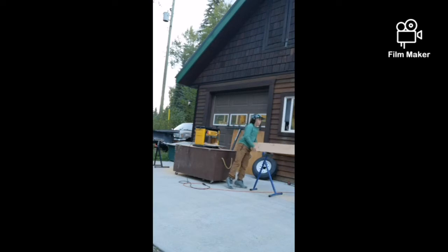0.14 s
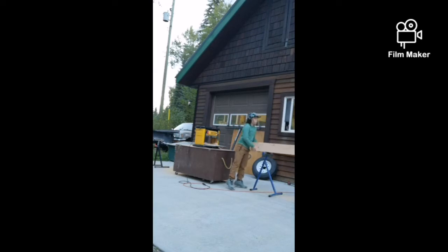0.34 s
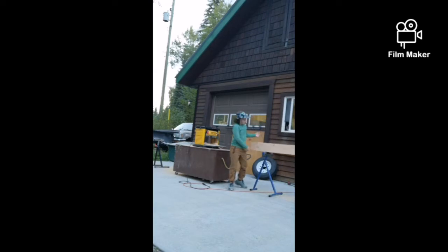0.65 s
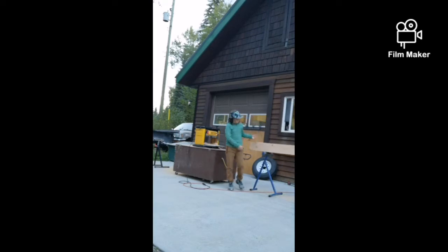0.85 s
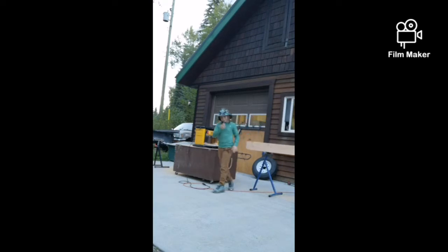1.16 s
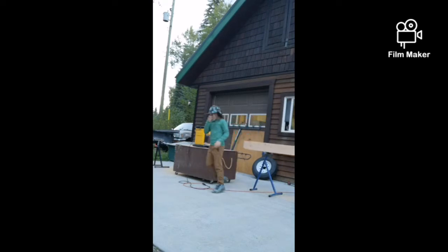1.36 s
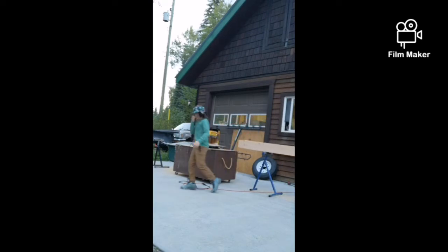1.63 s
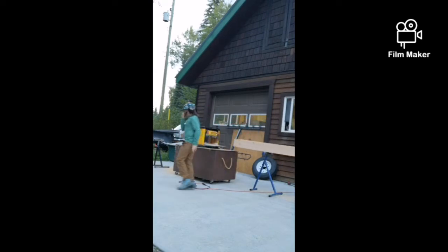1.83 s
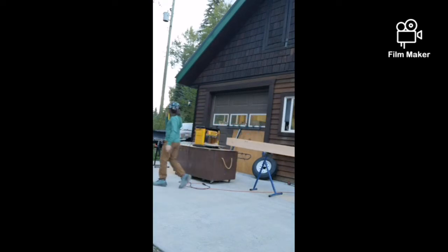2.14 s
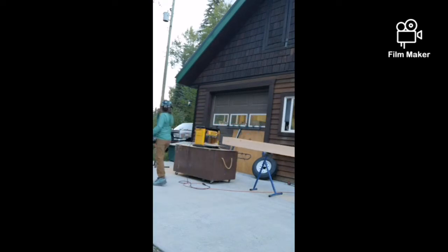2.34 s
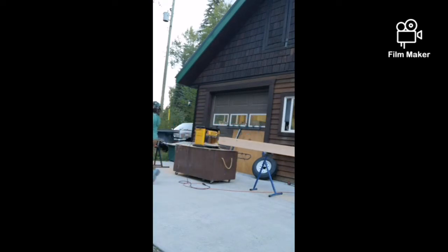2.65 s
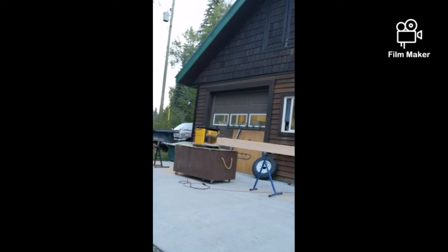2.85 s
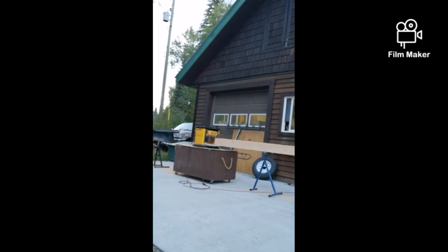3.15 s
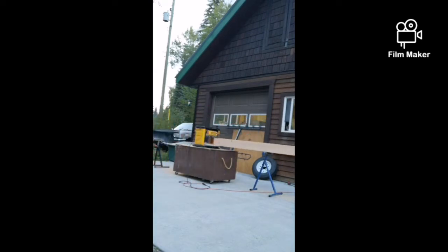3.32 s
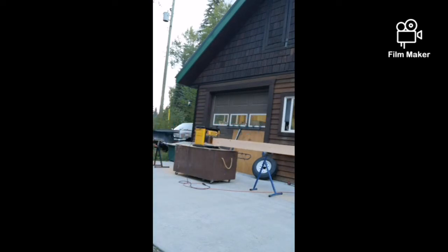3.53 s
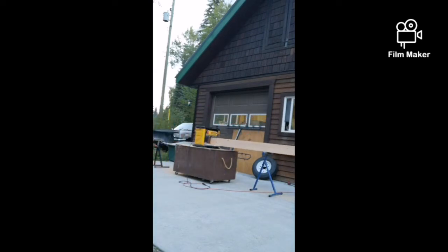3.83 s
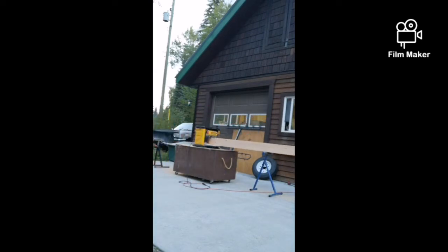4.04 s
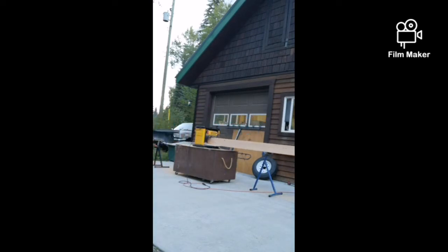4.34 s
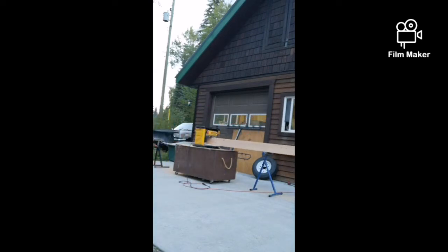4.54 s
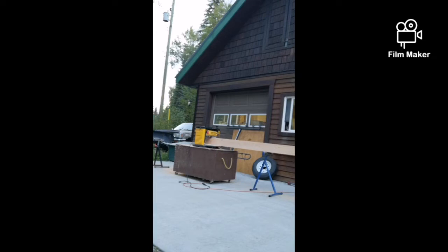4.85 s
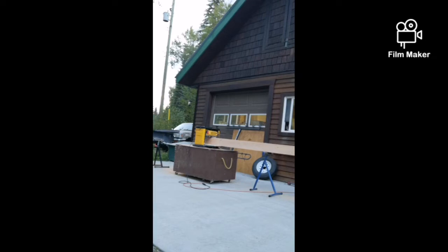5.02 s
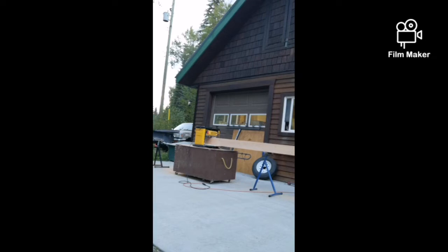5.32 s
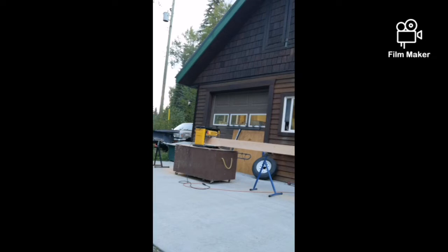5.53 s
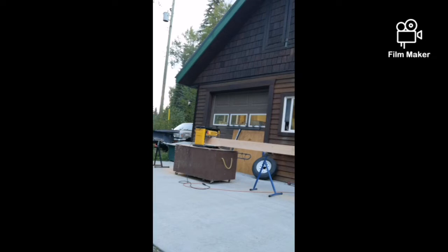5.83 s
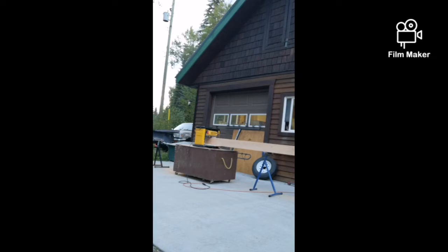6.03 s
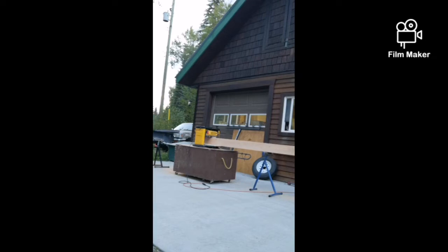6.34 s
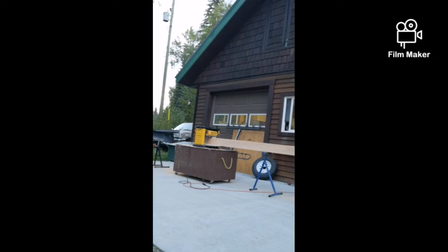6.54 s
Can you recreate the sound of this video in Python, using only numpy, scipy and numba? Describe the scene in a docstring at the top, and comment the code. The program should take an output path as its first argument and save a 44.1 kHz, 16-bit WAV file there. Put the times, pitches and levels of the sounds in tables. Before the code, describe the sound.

An electric wood planer idles steadily in a yard, then rasps and hammers through timber, chips hissing and the motor slowing.

```python
"""A paved yard in front of a garage, where a benchtop planer runs some metres from a phone.
Idling, its cutter head hums and the motor fan whines over rushing air; a passer-by shades the treble.
A wooden post bumps and squeaks through the rollers, then meets the knives with a short shriek.
They hammer and rasp the timber, chips hiss, and the load drags the motor's pitch down."""
import sys
import numpy as np
from scipy import signal
from scipy.fft import rfft, irfft
from scipy.io import wavfile
from scipy.ndimage import uniform_filter1d
from numba import njit

SR = 44100
rng = np.random.default_rng(int(sys.argv[2]) if len(sys.argv) > 2 else 0)


def to_wav(sig):
    """Store sig (one row per channel, or 1-D mono) as 16-bit WAV at the path in sys.argv[1].

    Samples outside -1..1 are clipped; the rate is SR.
    """
    pcm = np.clip(np.atleast_2d(sig), -1, 1) * 32767
    pcm = np.round(pcm).astype(np.int16)
    wavfile.write(sys.argv[1], SR, pcm.T)  # frames by channels


N = 294588
TIME = np.arange(N) / SR
FREQS = np.maximum(np.fft.rfftfreq(N, 1 / SR), 1)

# cutter head speed, sagging under load: time_s, speed_hz
HEAD_SPEED = [(0, 171.85), (3.6, 172.07), (4.68, 171.8), (4.85, 168.6), (4.95, 165.2), (5.16, 159.7),
              (5.34, 152.6), (5.69, 132.8), (5.8, 131.4), (6.15, 131.5), (6.34, 127.5), (6.68, 128.35)]
# harmonics of the hum: head_speed_multiple, level_db
HUM_HARMONICS = [(1, 0), (2, -16.5), (3, -28), (4, -34), (6, -24)]
# pitches where reflections cancel the hum: pitch_hz, width_hz, gain_db
HUM_NULLS = [(160.4, 4.5, -19), (127, 11, -27)]
# motor unbalance and fan blade tones: motor_speed_multiple, level_db
FAN_TONES = [(1, -44), (8, -56), (12, -43.5), (15, -46.5), (16, -40.5), (17, -53), (19, -48.5), (20, -41.5),
             (21, -51)]
# EQ of the air rushing through fan and head: frequency_hz, gain_db
AIR_EQ = [(25, -23.5), (65, -17.5), (90, -4.5), (150, 6), (205, -4.5), (430, 2.5), (750, -4), (1130, -4),
          (1290, -14.5), (1850, -10.5), (2250, -3.5), (3000, -9), (4400, -9), (7200, -7.5)]
# fan duct resonances: pitch_hz, width_hz, boost_db
DUCT_PEAKS = [(1030, 270, 1), (1693, 65, 7), (2600, 1400, 1.5), (3473, 130, 8), (4930, 150, 3.5),
              (5700, 420, 3.5), (6310, 110, 9.5), (6730, 48, 10), (6990, 170, 11.5)]
# dull bumps as the post is drawn in: start_s, pitch_hz, decay_s, level_db
BUMPS = [(3.171, 36.6, 0.17, -50), (3.402, 89, 0.42, -44)]
# the knives dig in: start_s, length_s, depth, added_roughness, pocket_start_hz, pocket_end_hz
BITES = [(4.694, 0.12, 0.45, 0.02, 3300, 2130), (4.995, .17, 0, 0, 2470, 1540),
         (5.3, 0.074, 0.03, 0, 2730, 1660), (5.537, 0.087, 0.48, 0, 2760, 2010),
         (6.148, 0.15, 0.78, 0, 3170, 1160)]
# slaps off paving and wall: delay_s, level_db
ECHOES = [(.0023, -14), (.0117, -14)]
# low resonances of the post: pitch_hz, width_hz, level_db
POST_MODES = [(270, 9, -2.4), (304, 9, 0.0), (379, 9, -2.0), (416, 9, -10.7), (457, 25, -8.9),
              (502, 9, -10.0), (549, 9, -1.2), (600, 23, -5.3)]
# resonances of the planer's housing: pitch_hz, width_hz, level_db
HOUSING_MODES = [(650, 10, -2.5), (708, 9, -3.6), (768, 19, -5.3), (862, 10, -7.1), (895, 9, -9.7),
                 (973, 17, -1.4), (1015, 26, -0.3), (1079, 10, 0.0), (1121, 25, -7.0)]
# ring of knives and steel bed: pitch_hz, width_hz, level_db
STEEL_MODES = [(1207, 25, -5.5), (1250, 120, -11), (1399, 42, -7), (1584, 74, -5.5), (1728, 13.7, -2),
               (1824, 97, -6), (1916, 12, -9.5), (2102, 87, -3.5), (2148, 28, -2.5), (2320, 220, -6),
               (2483, 41, -1), (2652, 94, -6), (3184, 41, -6), (3497, 166, -8.5)]
# EQ of the chip spray: frequency_hz, gain_db
CHIP_EQ = [(1500, -20.5), (3300, -14), (4150, 4.5), (4600, 4.5), (5100, 0.5), (5500, 2.5), (6200, 3.5),
           (6600, 1.5), (7100, 6.5), (7800, -7)]
# harmonics that sing at first contact: head_speed_multiple, level_db
SHRIEK_TONES = [(20, -30), (30, -34.5)]

# faders of the cut: even_cut_db, full_strain_boost_db, full_bite_boost_db
BOOM_FADER, KNOCK_FADER = (-31, 2, 4.5), (-28.5, 3, 2)
RASP_FADER, CHIPS_FADER = (-27.5, 4, 4.5), (-33, 5, 9.5)
CONTACT_S = 4.675  # the post meets the knives
GRIP_S, ENGAGE_S = .02, .2  # time for the knives to catch, and for the post to slide fully under
BITE_ATTACK_S, BITE_RELEASE_S = .021, .11


def undb(db):
    """Decibels to gain."""
    return 10 ** (np.asarray(db) / 20)


def unit(x):
    """Scale to rms 1."""
    return x / np.sqrt(np.mean(x ** 2))


def steady(x):
    """Ride the level to rms 1 over a tenth of a second."""
    return x / np.sqrt(uniform_filter1d(x ** 2, SR // 10) + 1e-12)


def tone(cycles):
    """A sine of rms 1 with a random starting phase."""
    return np.sqrt(2) * np.sin(2 * np.pi * (cycles + rng.random()))


def wobble(rate_hz):
    """Smooth random modulation with a spread near 1."""
    steps = rng.standard_normal(1024)
    place = 2 * rate_hz * TIME
    k = place.astype(int) % 1023
    blend = (1 - np.cos(np.pi * (place % 1))) / 2
    return steps[k] + blend * (steps[k + 1] - steps[k])


def swell(start, length, attack, release):
    """Rise, hold until the length is over, fall; times in seconds."""
    return np.clip(np.minimum((TIME - start) / attack, 1 - (TIME - start - length) / release), 0, 1)


def bells(hz, peaks):
    """Summed gain of bell curves at hz, in dB."""
    return sum(db / (1 + (2 * (hz - centre) / width) ** 2) for centre, width, db in peaks)


def colour(x, eq, peaks=()):
    """Apply a broad EQ with bells on top, then scale to rms 1."""
    hz, db = np.transpose(eq)
    shape_db = np.interp(np.log(FREQS), np.log(hz), db) + bells(FREQS, peaks)
    return unit(irfft(rfft(x) * undb(shape_db), N))


def ring(x, modes):
    """Drive a set of resonances; neighbours swing in opposite senses."""
    response = sum((-1) ** k * undb(db) / (1 + 1j * (FREQS ** 2 - hz ** 2) / (FREQS * width))
                   for k, (hz, width, db) in enumerate(modes))
    return irfft(rfft(x) * response, N)


@njit
def sweep(x, hz, width_hz):
    """A band-pass whose centre moves every sample."""
    y, band, low = np.empty(len(x)), 0., 0.
    for i in range(len(x)):
        g, damping = np.tan(np.pi * hz[i] / SR), width_hz / hz[i]
        v = (band + g * (x[i] - low)) / (1 + g * (g + damping))
        band, low = 2 * v - band, low + 2 * g * v
        y[i] = damping * v
    return y


def head_speed():
    """Turns per second of the cutter head."""
    return np.interp(TIME, *np.transpose(HEAD_SPEED))


def drag(db_per_octave):
    """Gain that falls as the motor slows below idle."""
    speed = head_speed()
    return undb(db_per_octave * np.log2(speed / speed[0]))


def head_hum(turns, level_db=-19.5, rub_db=-1, cut_db=3, flutter_db=.56):
    """The head pumps air once a turn; the hum dips as its pitch crosses a null."""
    overtones = sum(undb(db + wobble(7.8)) * tone(k * turns) for k, db in HUM_HARMONICS[1:])
    load_db = rub_db * rubbing() + cut_db * cut_fade_in(ENGAGE_S)
    fader_db = level_db + load_db + bells(head_speed(), HUM_NULLS) + flutter_db * wobble(4.8)
    return drag(db_per_octave=8) * undb(fader_db) * (tone(turns) + overtones)


def fan_whine(turns, belt_ratio=1.978, flutter_db=.87):
    """Tones of the belted motor and its fan; the shaft tone beats with the hum's second harmonic."""
    shaft = belt_ratio * turns + .004 * wobble(4)
    whine = sum(undb(db + flutter_db * wobble(8.9)) * tone(k * shaft) for k, db in FAN_TONES)
    return drag(db_per_octave=30) * whine


def air_rush(level_db=-26.5, gust_db=.5):
    """Turbulence in the duct, softer as the motor slows."""
    gain = drag(db_per_octave=6) * undb(level_db + gust_db * wobble(5.7))
    return gain * colour(rng.standard_normal(N), AIR_EQ, DUCT_PEAKS)


def passer_by(x, middle_s=1.61, half_length_s=.2, corner_hz=2800, treble_db=-5):
    """Lows bend round a passing body while the highs are shaded."""
    lows = irfft(rfft(x) / (1 + (FREQS / corner_hz) ** 4), N)
    blocked = np.exp(-((TIME - middle_s) / half_length_s) ** 4)
    return lows + undb(treble_db * blocked) * (x - lows)


def roller_bumps(attack_s=.011, waver_cycles=.083):
    """Low, wavering thuds as the rollers take the post."""
    bumps = np.zeros(N)
    for start, hz, decay, db in BUMPS:
        age = np.maximum(TIME - start, 0)
        envelope = np.exp(-age / decay) * (1 - np.exp(-age / attack_s))
        bumps += undb(db) * envelope * tone(hz * age + waver_cycles * wobble(15))
    return bumps


def rubbing():
    """Pressure of the post on the infeed, 0-1."""
    return swell(start=4.22, length=.42, attack=.13, release=.13)


def infeed_squeak(pitch_hz=1655, level_db=-46.5, waver_cycles=.083):
    """The post rubs on its way in with a thin, unsteady squeak."""
    return undb(level_db) * rubbing() * tone(pitch_hz * TIME + waver_cycles * wobble(21))


def shriek(turns, flutter_db=2.5):
    """Two high harmonics sing out as the knives graze the end of the post."""
    envelope = swell(CONTACT_S, length=.08, attack=BITE_ATTACK_S, release=.13)
    return envelope * sum(undb(db + flutter_db * wobble(30)) * tone(k * turns) for k, db in SHRIEK_TONES)


def cut_fade_in(rise_s):
    """A ramp from 0 to 1 once the post meets the knives."""
    return np.clip((TIME - CONTACT_S) / rise_s, 0, 1)


def effort(even_roughness=.11, strain_roughness=.14):
    """Controls of the cut, 0-1: strain (how fast the head brakes), bite depth, tearing of the grain."""
    braking = uniform_filter1d(np.maximum(-np.gradient(head_speed()), 0), SR // 20)
    strain = braking / braking.max()
    bite = np.zeros(N)
    tear = even_roughness + strain_roughness * strain
    for start, length, depth, roughness, _, _ in BITES:
        envelope = swell(start, length, BITE_ATTACK_S, BITE_RELEASE_S)
        bite += depth * envelope
        tear += roughness * envelope
    return strain, bite, tear


def knife_blows(turns, tear, second_knife=.13, scatter_db=5, jitter_s=.00006, half_taps=8):
    """Two knives strike each turn, one set lower; torn grain unsettles force and timing."""
    strikes = np.arange(1, int(2 * turns[-1]))
    when = np.interp(strikes / 2, turns, TIME)
    roughness = np.interp(when, TIME, tear)
    chance = rng.standard_normal((len(when), 2))
    force = np.where(strikes % 2, second_knife, 1) * undb(scatter_db * roughness * chance[:, 0])
    place = (when + jitter_s * roughness * chance[:, 1]) * SR
    # windowed sinc clicks can land between samples
    taps = place.astype(int)[:, None] + np.arange(-half_taps, half_taps + 1)
    offset = taps - place[:, None]
    clicks = force[:, None] * np.sinc(offset) * np.sinc(offset / (half_taps + 1))
    blows = np.zeros(N)
    np.add.at(blows, np.clip(taps, 0, N - 1), clicks)
    return unit(blows)


def yard(x, tail_db, t60_s=.15):
    """Add two hard slaps and a short scattered tail."""
    age = TIME[:16384]
    tail = rng.standard_normal(len(age)) * undb(-60 * age / t60_s)
    response = undb(tail_db) * tail / np.linalg.norm(tail)
    response[0] = 1
    for delay, db in ECHOES:
        response[int(delay * SR)] += undb(db)
    return signal.fftconvolve(x, response)[:N]


def body_howl(blows, modes):
    """A heavy part howls whenever a falling harmonic of the blows crosses one of its resonances."""
    body = ring(blows, modes)
    return body / np.std(body[TIME > CONTACT_S])


def air_pocket(drive, rest_hz=1965., width_hz=780.):
    """Air between knives and post resonates, gliding down through each bite, then back to rest."""
    hz = np.full(N, rest_hz)
    for start, length, _, _, start_hz, end_hz in BITES:
        progress = (TIME - start) / (length + BITE_RELEASE_S)
        during = (progress > 0) & (progress < 1)
        hz[during] = start_hz * (end_hz / start_hz) ** progress[during]
    hz = uniform_filter1d(hz, SR // 50)
    return unit(sweep(sweep(drive, hz, width_hz), hz, width_hz))


def knife_rasp(drive, tear, pocket_mix=2.66):
    """Knives and bed ring; the air pocket comes forward as the grain tears."""
    steel = unit(ring(drive, STEEL_MODES))
    return steady(steel + pocket_mix * tear * air_pocket(drive))


def chute_hiss(spray, bite, pitch_hz=6880, width_hz=690, full_bite_db=-26.5):
    """In the deepest bites a rush of chips hisses in the chute."""
    mode = [(pitch_hz, width_hz, 0)]
    return undb(full_bite_db) * bite ** 3 * steady(ring(ring(spray, mode), mode))


def cutting(turns, burst_decay_turns=.8, rasp_noise=.31, chip_noise=4.3):
    """Knife blows ring post, housing and steel; each turn throws a burst of splinters and chips."""
    strain, bite, tear = effort()

    def fader(even_db, strain_db, bite_db):
        return undb(even_db + strain_db * strain + bite_db * bite)

    blows = knife_blows(turns, tear)
    bursts = np.exp(-(turns % 1) / burst_decay_turns)
    splinters = tear * unit(rng.standard_normal(N) * bursts)
    # heavy parts feel only the blows; the brighter the layer, the more the yard scatters it
    heavy = yard(blows, tail_db=-20)
    light = yard(blows + rasp_noise * splinters, tail_db=-7)
    spray = yard(blows + chip_noise * splinters, tail_db=3)
    boom = fader(*BOOM_FADER) * body_howl(heavy, POST_MODES)
    knock = fader(*KNOCK_FADER) * body_howl(heavy, HOUSING_MODES)
    rasp = fader(*RASP_FADER) * knife_rasp(light, tear)
    chips = fader(*CHIPS_FADER) * steady(colour(spray, CHIP_EQ)) + chute_hiss(spray, bite)
    return cut_fade_in(ENGAGE_S) * (boom + knock) + cut_fade_in(GRIP_S) * (rasp + chips)


def scene():
    """Hum, whine and cut lock to one turning shaft; the mix is dual mono."""
    turns = np.cumsum(head_speed()) / SR
    machine = head_hum(turns) + passer_by(fan_whine(turns) + air_rush())
    timber = roller_bumps() + infeed_squeak() + shriek(turns) + cutting(turns)
    mix = machine + timber
    return np.array([mix, mix])


def record(dry, rolloff_hz=7420, order=24, cutoff_hz=7850):
    """The phone's narrow band: a rounded shoulder, then a steep high cut."""
    rounded = irfft(rfft(dry) / (1 + (FREQS / rolloff_hz) ** (2 * order)), N)
    high_cut = signal.ellip(10, .2, 80, cutoff_hz, fs=SR, output="sos")
    return signal.sosfilt(high_cut, rounded)


dry = scene()
out = record(dry)
to_wav(out)
```